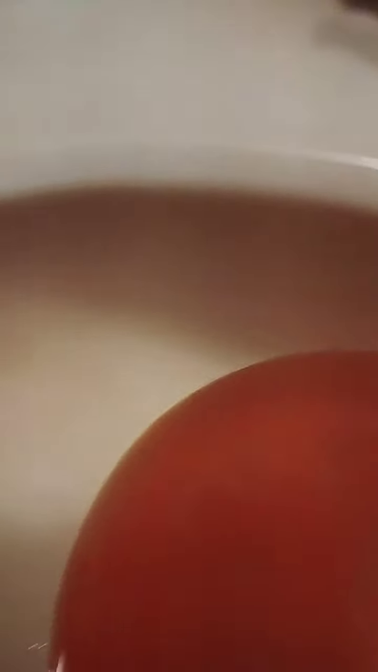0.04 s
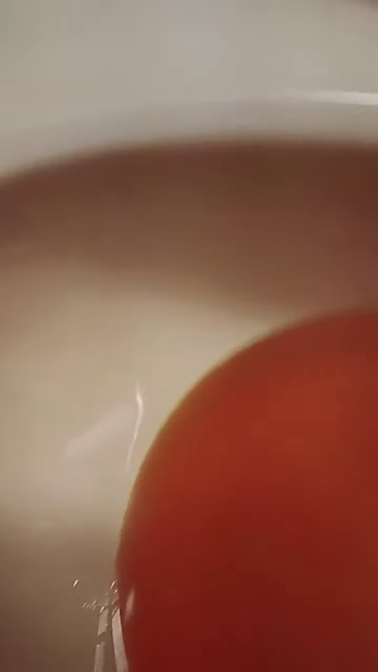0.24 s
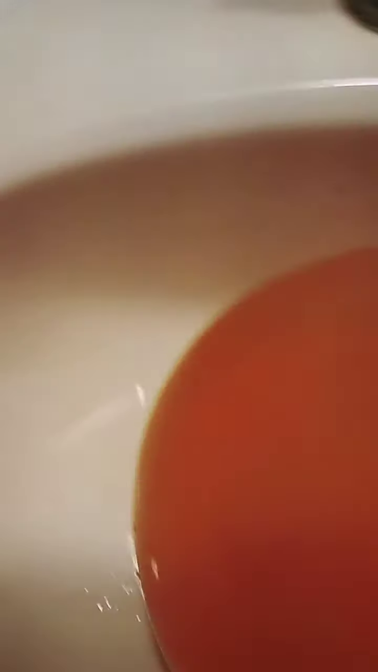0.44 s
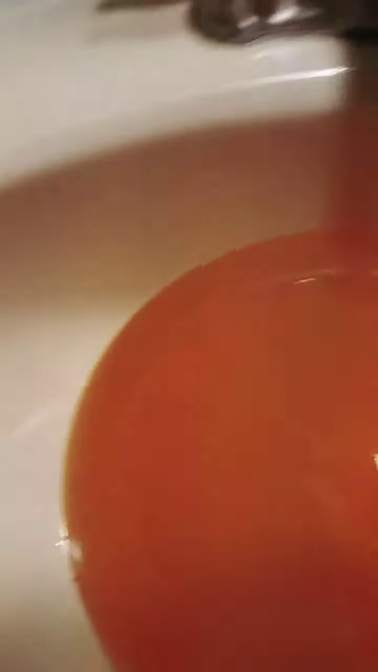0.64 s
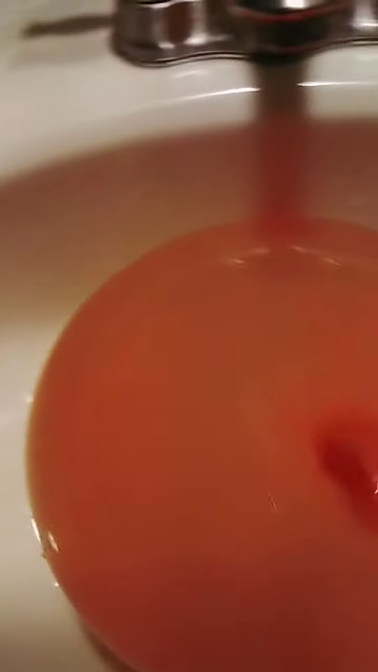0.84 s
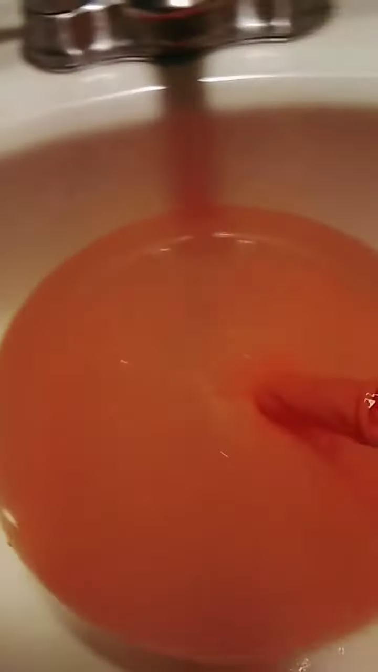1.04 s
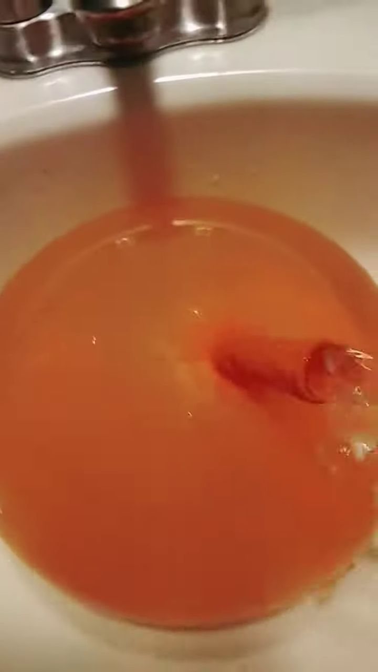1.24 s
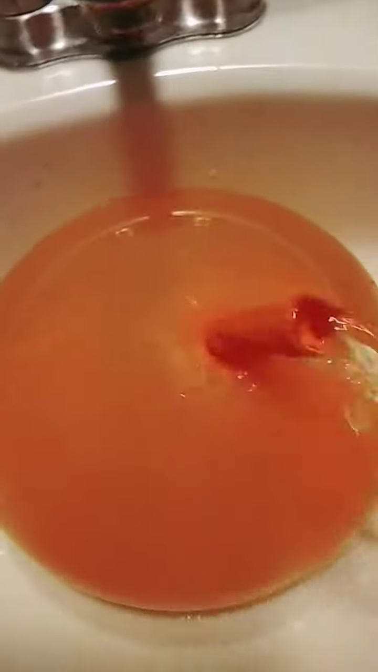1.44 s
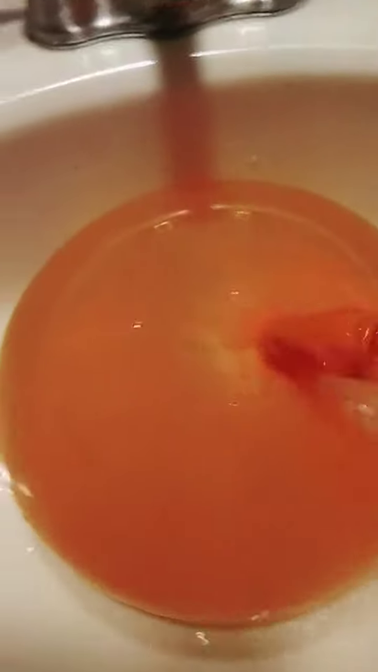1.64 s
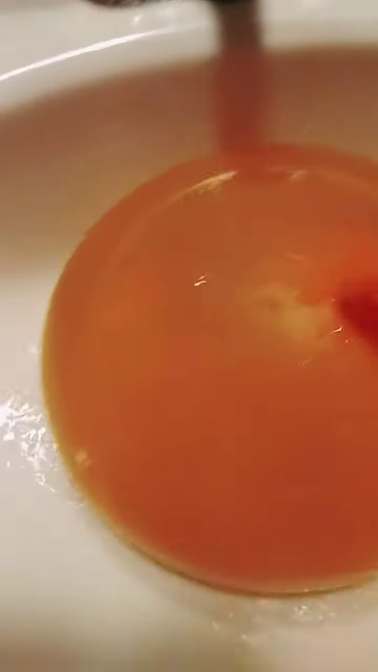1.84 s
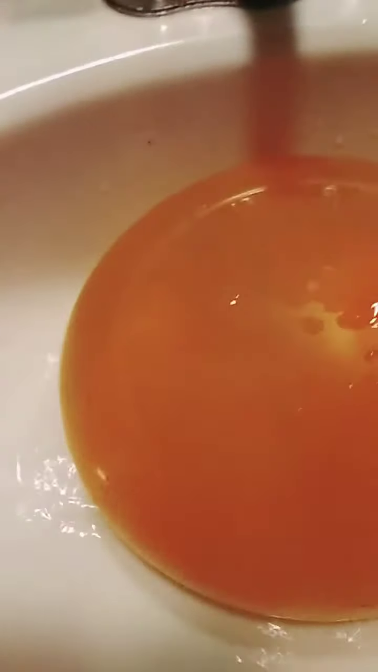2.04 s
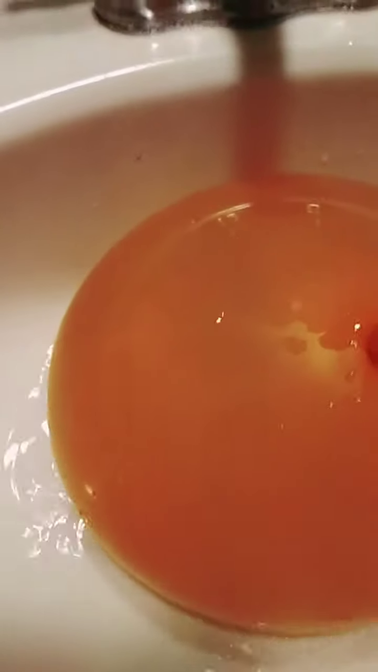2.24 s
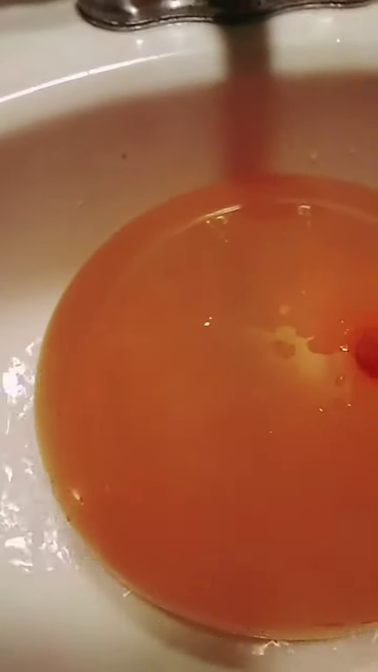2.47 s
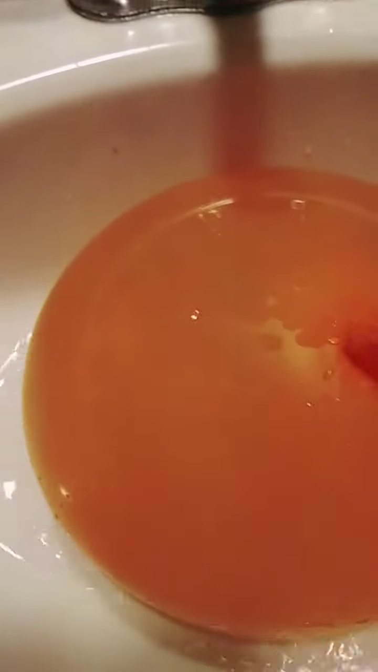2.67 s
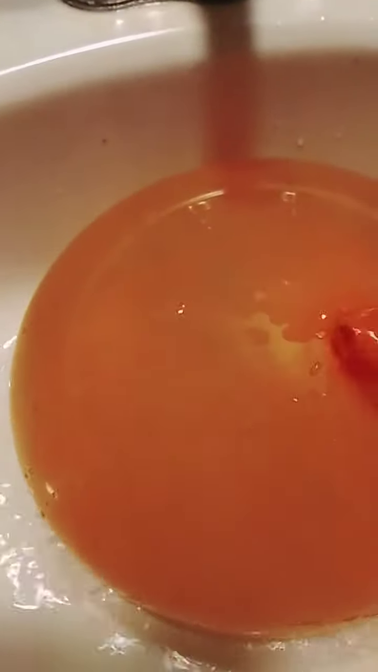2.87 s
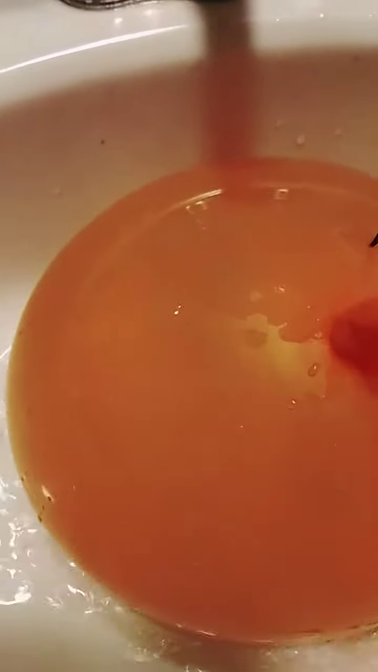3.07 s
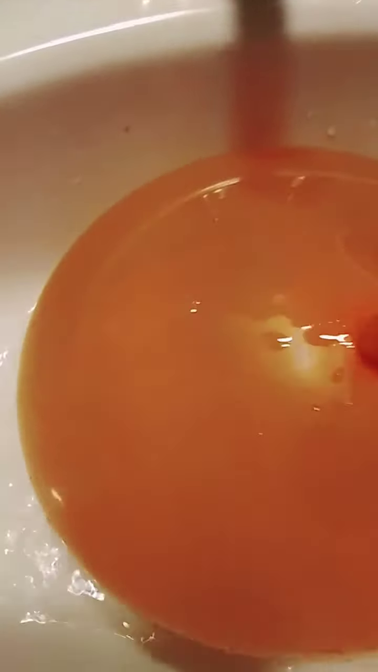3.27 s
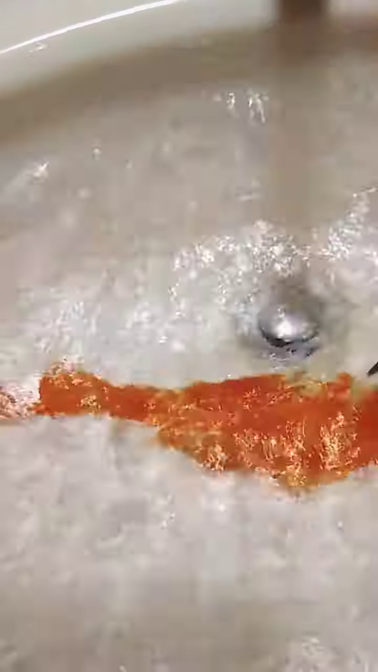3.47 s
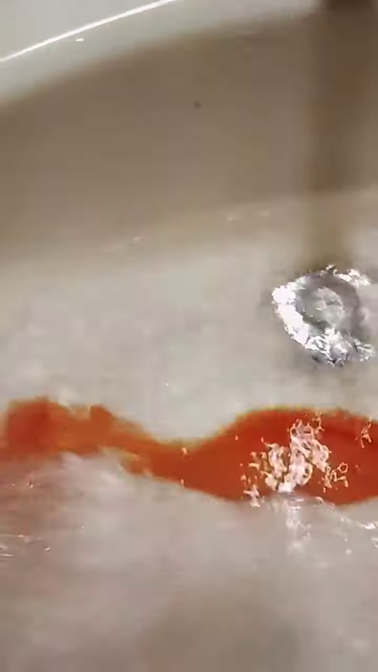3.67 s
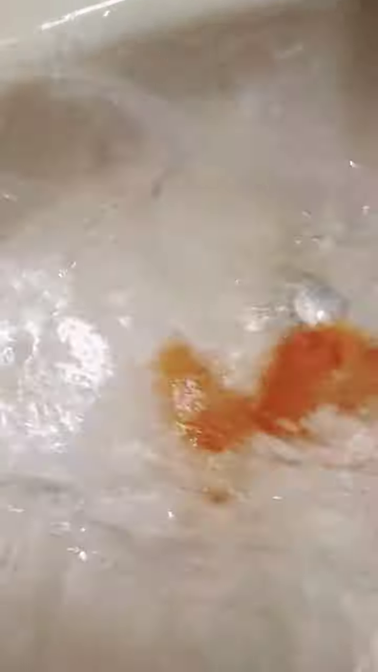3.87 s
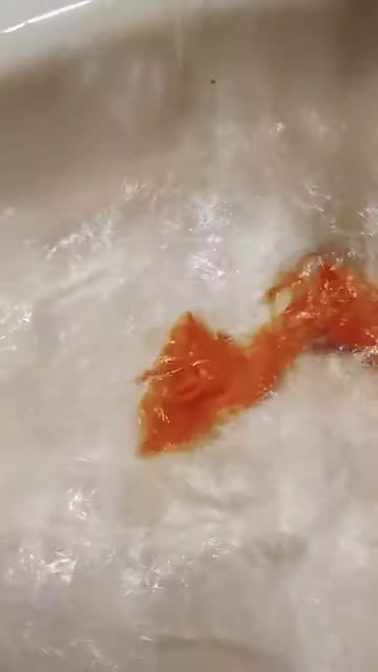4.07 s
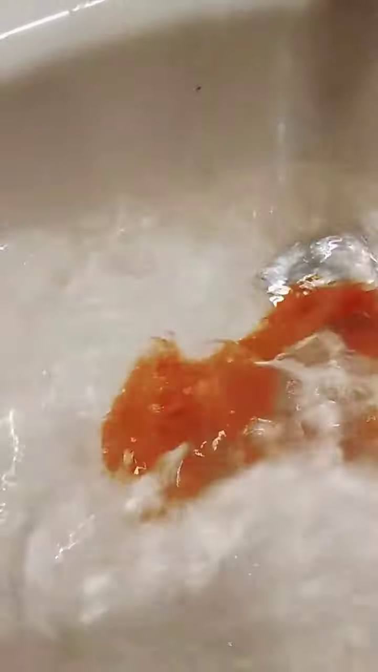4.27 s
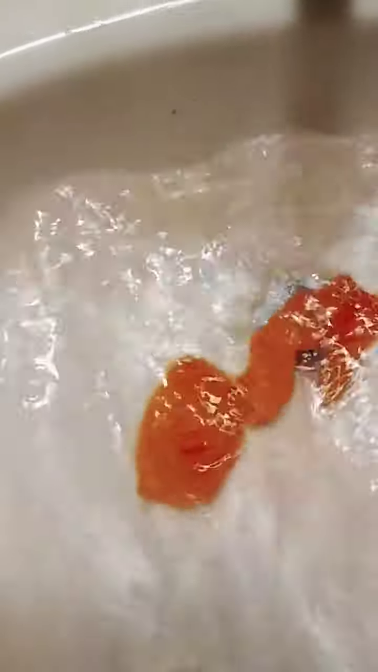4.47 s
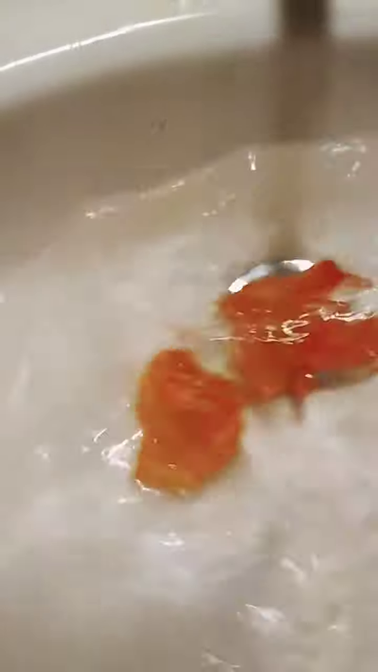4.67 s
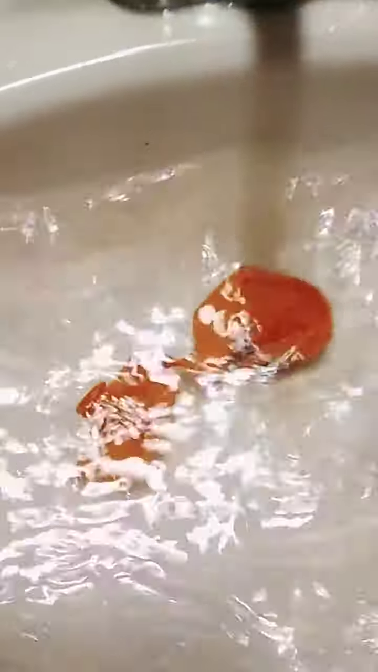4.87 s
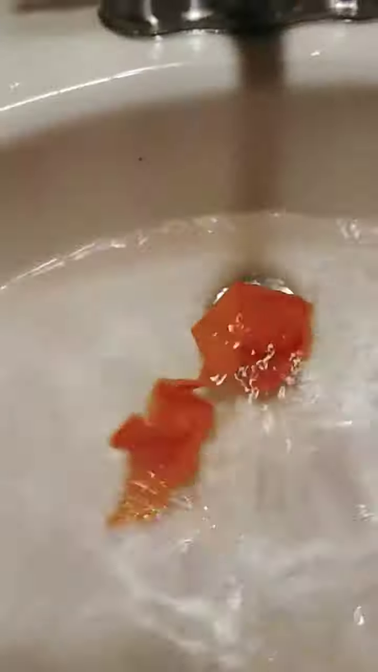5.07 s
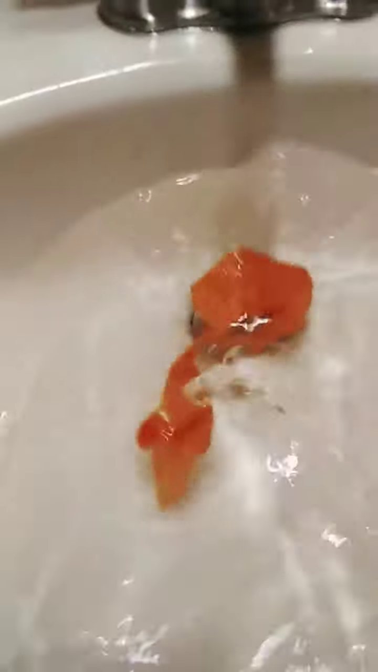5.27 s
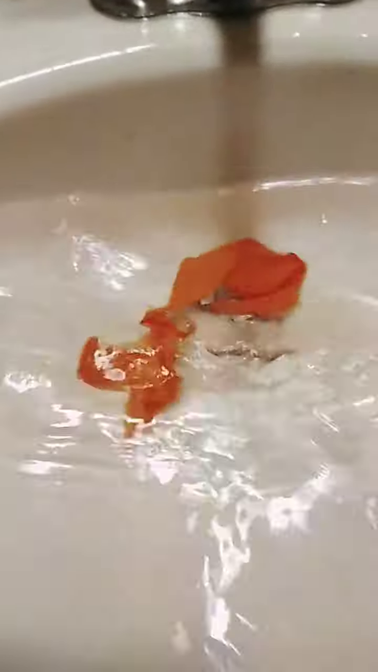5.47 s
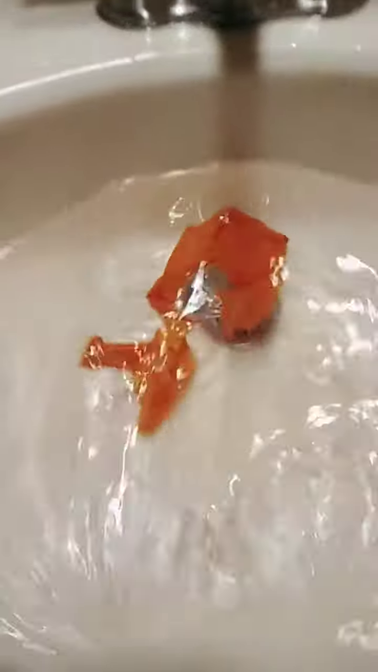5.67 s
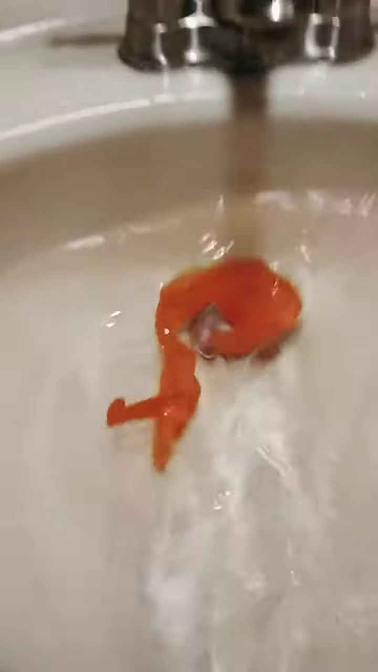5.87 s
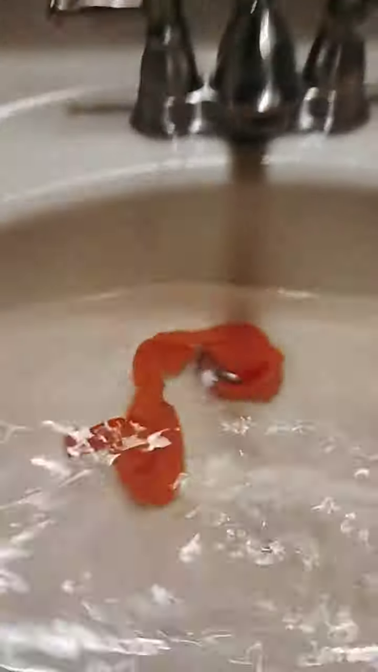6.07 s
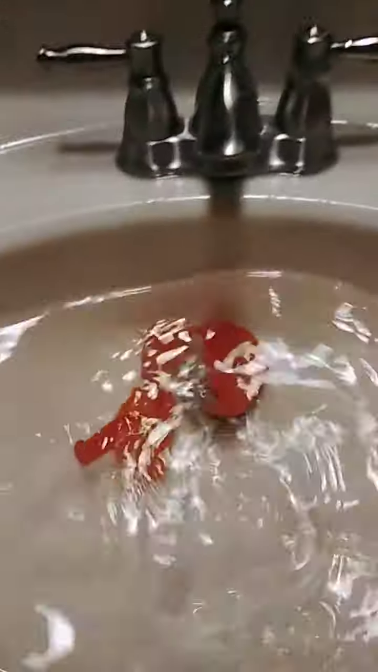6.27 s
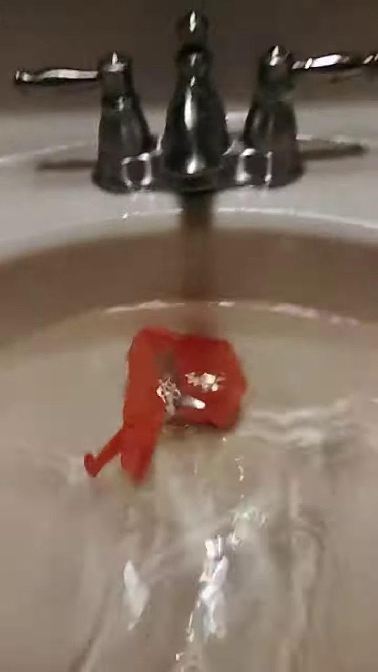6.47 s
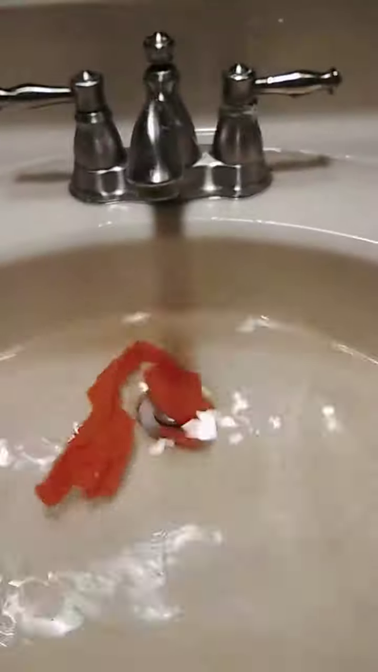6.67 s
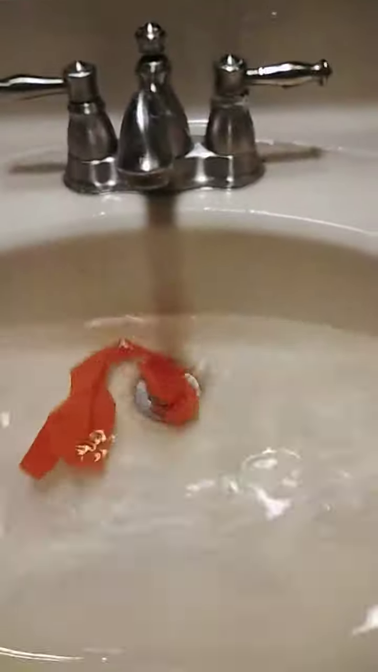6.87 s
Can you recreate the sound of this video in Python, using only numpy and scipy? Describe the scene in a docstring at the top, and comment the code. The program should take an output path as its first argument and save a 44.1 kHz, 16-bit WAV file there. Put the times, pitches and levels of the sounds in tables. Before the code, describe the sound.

Thin spitting drops and small gurgles, a sudden loud burst of water slapping ceramic, a fizzing, glugging slosh, then quiet ticks and trickle.

```python
"""In a small, hard-walled bathroom a punctured water balloon leaks into a ceramic basin, then bursts.
Its jet spatters as drops that crack the water film and ring trapped bubbles; pockets, gulps and glugs gurgle.
The freed water is swarms of bubbles swelling with the slosh, amid sprays of coloured noise and deep thuds.
Last drops tick over a faint crackling runoff, wet rubber rasps near the end, and still air hisses below."""
import sys
import numpy as np
from scipy import signal
from scipy.fft import rfft, irfft, next_fast_len
from scipy.io import wavfile

SR = 44100
rng = np.random.default_rng(int(sys.argv[2]) if len(sys.argv) > 2 else 0)


def dump_mix(stems):
    """Bounce the given channels to the path in sys.argv[1] as a 16-bit WAV at rate SR."""
    frames = np.atleast_2d(stems).T  # one column per channel
    limited = np.clip(frames, -1, 1)  # hard clip at full scale
    pcm = np.round(limited * 32767).astype(np.int16)
    wavfile.write(sys.argv[1], SR, pcm)


N = 304731
TIME = np.arange(N) / SR   # s
CUTOFF_HZ = 16000   # upper limit of the sound

# the leaking jet, before layer trims: time_s, spray_db, gurgle_db
LEAK = [(0.0, -62, -81), (0.16, -35.5, -75), (0.28, -72, -92), (0.38, -32.5, -67), (0.49, -35.5, -58),
        (0.65, -44, -58.5), (0.87, -33.5, -76), (0.96, -44.5, -67), (1.27, -52, -71), (1.62, -49, -61),
        (1.75, -43, -57.5), (2.13, -38, -54.5), (2.24, -53.5, -71.5), (2.47, -41, -54), (2.69, -39, -57),
        (2.91, -37, -82), (3.06, -63.5, -80), (3.22, -42.5, -76)]
# colour of fine spray: freq_hz, level_db (relative, per Hz)
SPRAY = [(1800, -20.5), (3000, -13.5), (4500, -19), (6000, -6), (7800, 5), (10000, 0.5), (12500, -4),
         (16000, -16.5)]
# colour of gurgling bubbles: freq_hz, level_db (relative, per Hz)
GURGLE = [(360, -4.5), (450, -12), (620, -19), (900, -2.5), (1600, 3), (2500, 2.5), (4500, 10)]


def leak(spray_db=-3.5, gurgle_db=0.5):
    """Bubble resonance: the thin jet excites many small bubbles, heard as scattered ticks and gurgles."""
    spray, gurgle = gains(LEAK)
    fizz = swarm(SPRAY, span=(0, 3.25), cycles=4.5, rise=0.03, count=700)
    babble = swarm(GURGLE, span=(0, 3.25), cycles=3.2, rise=0.03, count=1000)
    return from_db(spray_db) * spray * fizz + from_db(gurgle_db) * gurgle * babble


def all_drops(count=44):
    """Secondary impact: louder drops throw up weaker rebounds; stray drops follow the jet's level."""
    # louder drops on the wet basin: start_s, level_db (before layer trims), pitch_hz (trapped bubble)
    louder = [(0.068, -35, 6100), (0.0924, -18, 8800), (0.2123, -12, 10300), (0.2285, -5.5, 7660),
              (0.3526, -16.5, 7160), (0.416, -11.5, 4630), (0.523, -13.5, 6170), (0.5743, -19.5, 7730),
              (0.6628, -21, 9240), (0.735, -15.5, 8500), (0.8107, -20, 5300), (0.844, -17.5, 7440),
              (0.8744, -21, 8400), (0.9828, -20, 7150), (1.0254, -23, 7500), (1.1453, -16, 7300),
              (1.2262, -21, 7930), (1.2546, -7.5, 8130), (1.3792, -19.5, 7400), (1.4408, -13, 9000),
              (1.5632, -16.5, 6300), (1.607, -12, 7920), (1.682, -8, 7470), (1.7958, -21, 7300),
              (2.0941, -10.5, 4460), (2.141, -14, 10300), (2.1733, -17.5, 7730), (2.1971, -11.5, 7340),
              (2.474, -20.5, 7180), (2.598, -12.5, 7900), (2.6648, -10.5, 7430), (2.7622, -18, 5080),
              (2.8523, -10, 5150), (2.9855, -5, 7140), (3.2417, -19, 5900), (3.276, 11.5, 8400),
              (3.2864, 1, 8350), (3.3628, -5, 8030), (3.3773, 1.5, 7600), (3.527, -9.5, 8560),
              (3.5983, -8.5, 7480), (3.6882, -2, 7920), (3.8242, -1.5, 7500), (3.9225, 0, 7780),
              (3.9911, -5.5, 7460), (4.0712, -10, 7800), (4.188, -10, 8740), (4.2164, -8, 7420),
              (4.2727, -19, 4730), (4.5661, -14, 7420), (4.6533, -18, 9080), (4.7378, -22.5, 10260),
              (5.0429, -31.5, 10570), (5.239, -17, 8800), (5.425, -29.5, 8300), (5.7407, -27.5, 6900),
              (5.9049, -21, 5280), (6.353, -43, 5250)]
    rebound_db, rebound_octaves = -9, 0.68   # level below the first drop; full pitch spread
    rebounds = []
    for (s, db, hz), (late, pitch) in zip(louder, rng.random((len(louder), 2))):
        delay_s = 0.00882 + 0.0028 * late
        rebounds.append((s + delay_s, db + rebound_db, hz * 2 ** (rebound_octaves * (pitch - 0.5))))

    stray_db, stray_range_db = 19.5, 8.5   # most above the jet's spray level; spread below that
    stray_hz, stray_octaves = 7640, 0.9   # middle pitch; full spread
    jet_s, jet_db, _ = np.transpose(LEAK)
    when, size, pitch = rng.random((count, 3)).T
    start_s = (np.arange(count) + when) / count * jet_s[-1]
    level_db = np.interp(start_s, jet_s, jet_db) + stray_db - stray_range_db * size
    pitch_hz = stray_hz * 2 ** (stray_octaves * (pitch - 0.5))
    return list(louder) + rebounds + list(zip(start_s, level_db, pitch_hz))


def drops(rows, ring_db=-5.0, cycles=5.4, rise=0.043, crack_db=-14.5, crack_s=0.0015, crack_octaves=1.15,
          satellite_db=-14.5, scatter_s=0.018, lead_s=0.0055, octaves=1.4, mist_db=-25.0, mist_s=0.0084,
          shallow_db=-1.5):
    """Impact and resonance: a drop cracks the film around its bubble's pitch, amid satellites and mist."""
    drained_s = 4.9   # only a thin film is left after this
    out, hiss, t = np.zeros(N), noise(SPRAY), TIME[:SR // 12]
    crack, mist = (t / time * np.exp(1 - t / time) for time in (crack_s, mist_s))
    for (s, db, hz), (offset, damping) in zip(rows, rng.random((len(rows), 2))):
        drained = s > drained_s   # a thin film traps little air: drops splat more than they ring
        band = hz * 2 ** (crack_octaves * np.array([-0.5, 0.5]))
        band = np.minimum(band, [CUTOFF_HZ - 1, CUTOFF_HZ])
        band_filter = signal.butter(3, band, "band", fs=SR, output="sos")
        grit = rms_one(signal.sosfilt(band_filter, rng.standard_normal(len(t))))
        spray = hiss[int(offset * (N - len(t))):][:len(t)]
        ring = ping(hz, cycles * (0.5 + damping) / hz, rise)
        satellites = cloud(scatter_s, hz, octaves, cycles, count=5)
        add(out, s, from_db(db + ring_db + drained * shallow_db) * ring)
        add(out, s, from_db(db + crack_db) * crack * (grit + drained * spray))
        add(out, s if drained else s - lead_s, from_db(db + satellite_db) * satellites)
        add(out, s, from_db(db + mist_db) * mist * spray)
    return out


def impacts(rows, level_db=-27.0, body_hz=2600, decay=0.00053, hard_db=-4.5):
    """Cushioned impact: only hard drops push through the film and knock on the ceramic."""
    out = np.zeros(N)
    for s, db, hz in rows:
        cushion_db = min(db - hard_db, 0)   # soft drops weaken twice as fast in dB; hard ones are capped
        gain = from_db(min(db, hard_db) + cushion_db + level_db)
        add(out, s, gain * bubble(body_hz, decay, 0))
    return high_pass(out, 960)


def flood(spray_db=-34.0, gurgle_db=-37.5, slosh_db=-43.5):
    """Collective bubble resonance: the whole filling collapses into fizz, gurgles and deep slosh."""
    # colour of the deep slosh: freq_hz, level_db (relative, per Hz)
    slosh_colour = [(110, 5), (200, 2), (290, -12), (420, 5), (600, -9), (850, 2.5)]
    span = (3.25, 4.85)   # s
    spray = surge(hold_s=0.87, fall_db_per_s=38, swing_db=5.0, last_s=1.117)
    gurgle = surge(hold_s=0.77, fall_db_per_s=52, swing_db=3.5, last_s=1.123)
    deep = surge(hold_s=0.15, fall_db_per_s=20, swing_db=-1.5, last_s=1.45)
    fizz = swarm(SPRAY, span, cycles=3.3, rise=0.027, count=2000)
    babble = swarm(GURGLE, span, cycles=2.5, rise=0.02, count=2300)
    slosh = swarm(slosh_colour, span, cycles=1.36, rise=0.055, count=450)
    water = from_db(spray_db) * spray * fizz + from_db(gurgle_db) * gurgle * babble
    return water + from_db(slosh_db) * deep * slosh


def surge(hold_s, fall_db_per_s, swing_db, last_s):
    """Standing-wave modulation: freed water lands, holds, drains and ceases, its gain swinging with the slosh."""
    burst_s, landing_s = 3.268, 0.03   # the rubber rips; time for the water to land
    crest_s, slosh_period_s = 3.332, 0.54   # first crest of the wave; time to the next
    dry_fade_s = 0.034   # time for a layer to cease once its water has gone
    age = TIME - burst_s
    wave = np.cos(2 * np.pi * (TIME - crest_s) / slosh_period_s)
    wet = np.clip(age / landing_s, 0, 1) * np.clip((last_s - age) / dry_fade_s, 0, 1)
    # a positive swing is louder at the crests, a negative one between them
    return wet * from_db(swing_db * wave - fall_db_per_s * np.maximum(age - hold_s, 0))


def splashes(level_db=-11.5):
    """Broadband turbulence: sheets of water tear into spray, loudest as the rubber rips."""
    return from_db(level_db) * spray_gain() * noise(SPRAY)


def spray_gain():
    """Superposition: the gains of all the bursts of spray add."""
    # bursts of fine spray: crest_s, level_db (before layer trims), rise_s, fall_s
    bursts = [(0.233, -7, 0.0038, 0.0067), (3.275, 3, 0.0035, 0.0056), (3.289, -16.5, 0.0037, 0.015),
              (4.56, -35, 0.02, .03), (4.70, -38.5, 0.028, 0.024), (5.431, -30, 0.0035, 0.02),
              (5.762, -43.5, 0.018, 0.05), (5.85, -40.5, 0.036, .04), (5.913, -27, 0.0034, 0.033),
              (6.304, -29, 0.011, 0.009)]
    return sum(from_db(db) * swell(s, rise, fall) for s, db, rise, fall in bursts)


def pockets(level_db=-3.0):
    """Bubble resonance: lone air pockets pinched off in the water plop."""
    # air pockets: start_s, pitch_hz, level_db (before layer trim)
    air_pockets = [(0.419, 3810, -15.5), (0.588, 2140, -35), (0.983, 2840, -30), (1.065, 2460, -35),
                   (1.311, 2840, -31), (1.442, 2440, -32), (1.685, 3050, -21), (1.687, 1726, -22.5),
                   (1.997, 3040, -26.5), (2.147, 1940, -29.5), (2.759, 2320, -32.5), (3.308, 923, -22.5),
                   (3.365, 2200, -14), (3.496, 427, -30), (3.704, 1426, -22), (3.827, 2860, -12.5),
                   (3.964, 1582, -9.5), (4.416, 2790, -33.5), (5.845, 1820, -34)]
    out = np.zeros(N)
    for s, hz, db in air_pockets:
        add(out, s, from_db(db + level_db) * plop(hz))
    return out


def gulps(level_db=0.0, between_db=-10.0, scatter_s=0.04, octaves=1.2, lift=1.2, cycles=3.7, count=3):
    """Larger bubbles ring lower: a gulp opens with a high plop, gurgles down and closes with a low one."""
    # air gulped under the jet: start_s, length_s, first_hz, last_hz, first_db, last_db (relative levels)
    air_gulps = [(1.28, .02, 2600, 782, -45, -40.5), (1.42, .067, 1920, 948, -37.5, -32.5),
                 (1.647, 0.1, 1738, 893, -24.5, -28.5), (1.91, .038, 1072, 973, -37, -38),
                 (2.094, 0.045, 2630, 663, -24, -43.5), (2.196, 0.033, 3980, 1650, -22, -30.5),
                 (2.518, 0.02, 1522, 828, -28.5, -23.5), (2.607, .012, 2760, 1300, -34, -31.5),
                 (2.85, 0.008, 2796, 860, -16, -32), (3.021, 0.045, 1026, 672, -45.5, -46),
                 (4.237, 0.03, 1386, 962, -27, -32.5)]
    out = np.zeros(N)
    for s, length, first_hz, last_hz, first_db, last_db in air_gulps:
        add(out, s, from_db(first_db + level_db) * plop(first_hz))
        add(out, s + length, from_db(last_db + level_db) * plop(last_hz))
        for u in (np.arange(count) + 0.5) / count:
            hz = first_hz * (last_hz / first_hz) ** u
            db = first_db + (last_db - first_db) * u
            gurgle = cloud(scatter_s, lift * hz, octaves, cycles, count=6)
            add(out, s + u * length / 2, from_db(db + between_db) * gurgle)
    return out


def churns(level_db=3.0, octaves=1.4, cycles=4.5):
    """Air entrainment: water folding over itself gurgles as a cloud of bubbles."""
    # folding waves: start_s, length_s, centre_hz, level_db (per bubble, before layer trim)
    folds = [(0.235, 0.044, 2200, -45), (0.84, 0.08, 2510, -43), (0.858, 0.11, 403, -65.5),
             (1.247, 0.023, 3630, -33.5), (1.267, .06, 550, -63.5), (2.589, 0.11, 1314, -43.5),
             (3.269, 0.12, 1504, -27), (3.345, 0.0305, 204.8, -40.5), (3.49, 0.077, 602, -35),
             (3.691, 0.023, 2900, -25.5), (3.755, 0.018, 3860, -25), (3.832, 0.058, 1570, -29),
             (3.972, 0.14, 1504, -29.5), (4.204, 0.063, 1990, -33), (4.547, 0.055, 395, -49.5),
             (5.721, 0.069, 603, -64.5), (5.899, 0.05, 280, -63), (5.901, 0.01, 2450, -37.5),
             (6.032, 0.052, 926, -67.5), (6.285, 0.045, 3660, -51), (6.42, 0.017, 895, -67)]
    out = np.zeros(N)
    for s, length, hz, db in folds:
        add(out, s, from_db(db + level_db) * cloud(length, hz, octaves, cycles, count=24))
    return out


def glugs(bend=1.4, level_db=-2.0):
    """Cavity resonance: air closing over the drain shrinks and whistles upward, ever faster."""
    # closing cavities: start_s, length_s, first_hz, last_hz, level_db (before layer trim)
    cavities = [(3.046, 0.011, 1520, 2300, -39.5), (3.068, 0.039, 746, 1175, -48),
                (3.64, 0.0099, 3240, 5740, -24.5), (3.855, 0.019, 1057, 1740, -24),
                (3.963, 0.026, 755, 1084, -22.5), (4.005, 0.0298, 904, 1560, -28.5),
                (4.369, 0.021, 1130, 3080, -29.5), (4.419, 0.078, 610, 1446, -35),
                (4.542, 0.064, 615, 2100, -37)]
    out = np.zeros(N)
    for s, length, first_hz, last_hz, db in cavities:
        u = np.linspace(0, 1, int(length * SR))
        pitch = first_hz * (last_hz / first_hz) ** (u ** bend)
        whistle = np.sin(np.pi * u) * np.sin(2 * np.pi * np.cumsum(pitch) / SR)
        add(out, s, from_db(db + level_db) * whistle)
    return out


def runoff(spray_db=-73.0, gurgle_db=-77.5, fall_db_per_s=4.0, splash_fizz_db=-20.0, splash_gurgle_db=-33.0):
    """Exponential decay: the last film of water crackles ever fainter, stirred up by each splash."""
    # colour of the trickling film: freq_hz, level_db (relative, per Hz)
    trickle = [(220, 2.5), (500, -18), (950, 3.5), (1500, -7.5), (2600, -12.5)]
    span = (4.8, 6.9)   # s
    film, stir = from_db(-fall_db_per_s * (TIME - span[0])), spray_gain()
    fizz = swarm(SPRAY, span, cycles=5.0, rise=0.017, count=1400)
    babble = swarm(trickle, span, cycles=2.75, rise=0.035, count=1800)
    spray = from_db(spray_db) * film + from_db(splash_fizz_db) * stir
    gurgle = from_db(gurgle_db) * film + from_db(splash_gurgle_db) * stir
    return spray * fizz + gurgle * babble


def slips(level_db=-6.5, decay=0.0045):
    """Stick-slip friction: wet rubber grips and lets go in a short, dull rasp."""
    # slips of the wet skin: start_s, level_db (before layer trim)
    slip_rows = [(6.732, -51.5), (6.791, -48.5), (6.798, -40), (6.804, -42.5), (6.809, -43), (6.817, -44)]
    # colour of the rubber: freq_hz, level_db (relative, per Hz)
    rubber = [(260, -7), (520, 2), (1150, -7), (1900, -22), (2550, -12.5), (4500, -18.5)]
    grip, t = np.zeros(N), TIME[:SR // 20]
    for s, db in slip_rows:
        envelope = np.exp(-t / decay) * (1 - np.exp(-t / 0.00031))
        add(grip, s, from_db(db + level_db) * envelope)
    return grip * noise(rubber)


def basin(level_db=0.0, rise_s=0.013, fall_s=0.03, flood_db=-62.0, rest_db=-79.5, thump_db=-3.5, thump_hz=140,
          octaves=0.76, cycles=0.85, heavy_db=-34.5, cushion=0.42):
    """Structural response: the basin booms as water lands and rumbles on; heavy slops thump hollowly."""
    # masses of water landing: crest_s, level_db (before layer trims)
    thuds = [(0.242, -55), (0.421, -55), (0.51, -60), (1.70, -52), (1.95, -58), (2.11, -51), (2.55, -60),
             (2.872, -56.5), (3.30, -39), (3.348, -34), (3.602, -42), (3.851, -46), (4.008, -38.5),
             (4.86, -58), (5.91, -54.5), (6.24, -55), (6.60, -54.5)]
    # colour of the boom: freq_hz, level_db (relative, per Hz)
    boom_colour = [(30, -26), (45, -22.5), (60, -0.5), (75, 7.5), (95, -5.5), (125, 0.5), (170, -16.5),
                   (240, -23)]
    rumble = surge(hold_s=0.87, fall_db_per_s=11.5, swing_db=-2.0, last_s=6.2)
    boom = from_db(rest_db) + from_db(flood_db) * rumble
    thumps = np.zeros(N)
    for (s, db), size in zip(thuds, rng.random(len(thuds))):
        hz = thump_hz * 2 ** (octaves * (size - 0.5))
        boom = boom + from_db(db + level_db) * swell(s, rise_s, fall_s)
        softness_db = cushion * min(db - heavy_db, 0)   # lighter slops thump less than in proportion
        add(thumps, s, from_db(db + thump_db + softness_db) * ping(hz, cycles / hz, rise=0))
    return boom * noise(boom_colour) + thumps


def bathroom(x, tail_db=-9.0, build_s=0.021):
    """Reverberation: close echoes off basin and counter, then a diffuse tail that dies band by band."""
    # reverberation time: freq_hz, t60_s
    room_t60 = [(150, 0.15), (500, 0.15), (1300, 0.18), (3500, 0.16), (9000, 0.21), (16000, 0.2)]
    # basin and counter reflections: delay_s, strength (signed gain)
    echoes = [(.0007, 0.011), (.0019, -0.03), (.0032, 0.15), (.0088, -.2), (0.012, 0.17)]
    t, edges = TIME[:SR // 2], np.geomspace(100, 18000, 12)
    response, white = np.zeros(len(t)), rng.standard_normal((2, len(t)))
    for k, (low, high) in enumerate(zip(edges, edges[1:])):
        band_filter = signal.butter(2, [low, high], "band", fs=SR, output="sos")
        band = signal.sosfilt(band_filter, white[k % 2])   # neighbouring bands use different noise
        response += band * np.exp(-np.log(1000) * t / at_hz(room_t60, np.sqrt(low * high)))
    response *= 1 - np.exp(-t / build_s)
    response *= from_db(tail_db) / np.sqrt(np.sum(response ** 2))
    response[0] += 1   # direct sound
    for delay, strength in echoes:
        response[int(delay * SR)] += strength
    return signal.fftconvolve(x, response)[:N]


def still_air(level_db=-74.0):
    """Stationary noise: the room's still air is a faint, low-weighted hiss."""
    # colour of the air: freq_hz, level_db (relative, per Hz)
    air = [(30, -8), (75, -3), (150, -13), (400, -12), (1000, -21), (2500, -26.5), (8000, -32),
           (16000, -16)]
    return from_db(level_db) * noise(air)


def swarm(spectrum, span, cycles, rise, count):
    """Incoherent superposition: bubbles of random time, pitch and size fill a span at unit power."""
    size_spread_db = 7   # scale of the exponential spread in level
    out, (start, end) = np.zeros(N), span
    low, high = spectrum[0][0], spectrum[-1][0]
    for when, where, size, damping, sign in rng.random((count, 5)):
        hz = low * (high / low) ** where
        level = at_hz(spectrum, hz) + size_spread_db * min(-np.log(1 - size), np.pi)
        ring = ping(hz, cycles * (0.5 + damping) / hz, rise)
        # small bubbles die sooner, so they need more height for the same energy
        add(out, start + when * (end - start), np.sign(sign - 0.5) * hz * from_db(level) * ring)
    return rms_one(out) * np.sqrt((end - start) * SR / N)


def cloud(length, centre_hz, octaves, cycles, count):
    """Superposition: a short run of bubbles rings around one pitch."""
    longest_ring_s = 6 * cycles / centre_hz * 2 ** (octaves / 2)
    out = np.zeros(int((length + longest_ring_s) * SR) + 2)
    for when, where, size, sign in rng.random((count, 4)):
        hz = min(centre_hz * 2 ** (octaves * (where - 0.5)), CUTOFF_HZ)
        level = -10 * size - 6 * when   # sizes vary, and later bubbles are weaker
        add(out, when * length, np.sign(sign - 0.5) * from_db(level) * ping(hz, cycles / hz, rise=0.19))
    return out


def plop(hz, rise=0.04, birth=1.0, fragment_db=-1.0, scatter_s=0.016, octaves=0.54):
    """Bubble breakup: a larger trapped bubble rings and breaks into fragments of like size."""
    ring_cycles = 9.0   # the decay falls to 1/e in this many cycles
    out = np.zeros(SR // 5)
    add(out, 0, bubble(hz, ring_cycles / hz, rise, birth))
    add(out, 0, from_db(fragment_db) * cloud(scatter_s, hz, octaves, cycles=1.7, count=4))
    return out


def bubble(hz, decay, rise, birth=0.88):
    """Damped resonance: it swells over a cycle or so and rings down, rising in pitch near the surface."""
    t = np.arange(int(6 * decay * SR) + 2) / SR
    pitch = np.minimum(hz * (1 + rise * t / decay), SR / 2)
    shape = (1 - np.exp(-t * hz / birth)) ** 2 * np.exp(-t / decay)
    return shape / shape.max() * np.sin(2 * np.pi * np.cumsum(pitch) / SR)


def ping(hz, swell_s, rise):
    """Damped resonance: a ring swells smoothly to its crest and fades, its pitch sliding by rise."""
    u = np.arange(int(6 * swell_s * SR) + 2) / (swell_s * SR)
    pitch = np.minimum(hz * (1 + rise * (u - 1)), SR / 2)
    return (u * np.exp(1 - u)) ** 2 * np.sin(2 * np.pi * np.cumsum(pitch) / SR)


def noise(spectrum):
    """Spectral shaping: steady noise of a given colour at unit power, falling steeply outside its range."""
    hz = np.arange(1, N // 2 + 2) * SR / (2 * (N // 2))
    skirts = 1 / (1 + (spectrum[0][0] / hz) ** 4) / (1 + (hz / spectrum[-1][0]) ** 4)
    size = next_fast_len(N)
    bins_hz = np.arange(size // 2 + 1) * SR / size
    colour = np.interp(bins_hz, hz, skirts * from_db(at_hz(spectrum, hz)))
    return rms_one(irfft(rfft(rng.standard_normal(size)) * colour, size)[:N])


def high_pass(x, edge_hz):
    """Radiation efficiency: small sources radiate little below their own pitch."""
    return signal.sosfilt(signal.butter(3, edge_hz, "high", fs=SR, output="sos"), x)


def swell(s, rise_s, fall_s):
    """Exponential growth and decay: gain climbs to a crest at time s and dies away."""
    return np.exp(np.maximum(np.minimum((TIME - s) / rise_s, (s - TIME) / fall_s), -20))


def gains(rows, fade=0.0172):
    """Amplitude modulation: one gain curve per dB column, fading out beyond the ends."""
    s, *columns = np.transpose(rows)
    inside = np.interp(TIME, [s[0] - fade, s[0], s[-1], s[-1] + 2 * fade], [0, 1, 1, 0])
    return [inside * from_db(np.interp(TIME, s, c)) for c in columns]


def at_hz(points, hz):
    """Logarithmic pitch: read a table's second column on a log-frequency axis."""
    table = np.array(points)
    return np.interp(np.log(hz), np.log(table[:, 0]), table[:, 1])


def from_db(db):
    """Logarithmic level: decibels to amplitude gain."""
    return 10 ** (np.asarray(db) / 20)


def rms_one(x):
    """Normalisation: scale to unit mean power."""
    return x / np.sqrt(np.mean(x ** 2) + 1e-20)


def add(out, s, sound):
    """Linear superposition: mix a sound in at time s."""
    i = int(np.clip(s * SR, 0, len(out) - 1))
    out[i:i + len(sound)] += sound[:len(out) - i]


def scene():
    """Superposition: reverberant water over rubber, the basin's low thudding and still air."""
    falling = all_drops()
    water = leak() + drops(falling) + impacts(falling) + flood() + splashes()
    water = water + pockets() + gulps() + churns() + glugs() + runoff()
    return (bathroom(water) + slips() + basin() + still_air())[None]


def record(dry):
    """Saturation and band limiting: the highest peaks are rounded and the top is cut."""
    rounded = 0.85 * np.tanh(dry / 0.85)
    return signal.sosfilt(signal.ellip(10, 0.2, 70, CUTOFF_HZ, fs=SR, output="sos"), rounded)


dry = scene()
out = record(dry)
dump_mix(out)
```